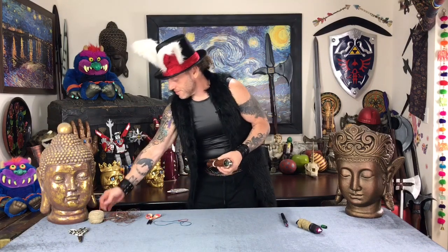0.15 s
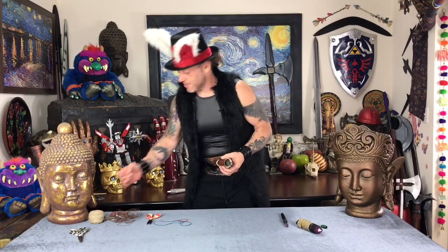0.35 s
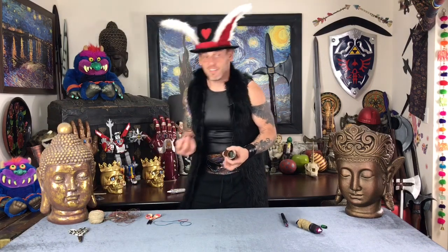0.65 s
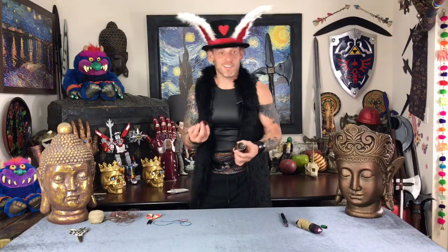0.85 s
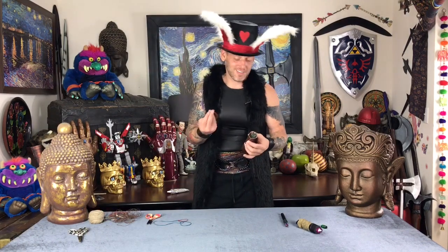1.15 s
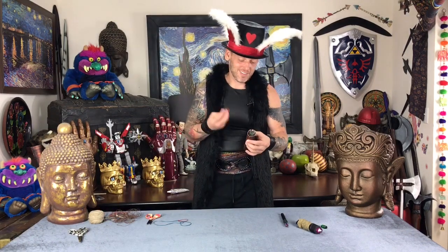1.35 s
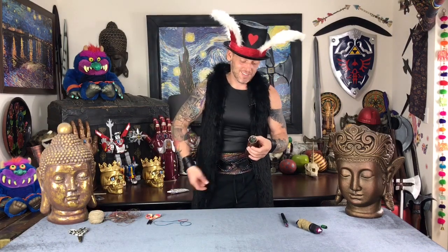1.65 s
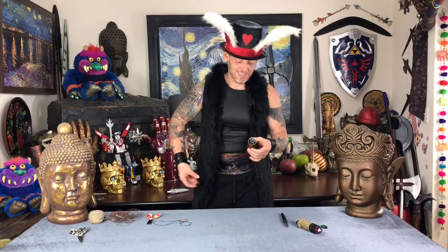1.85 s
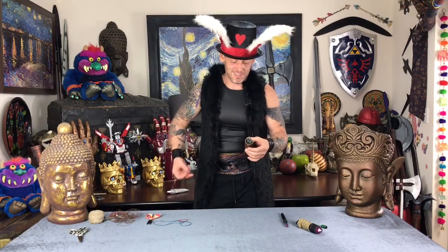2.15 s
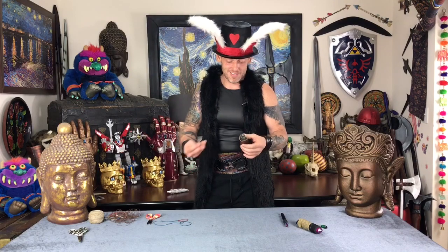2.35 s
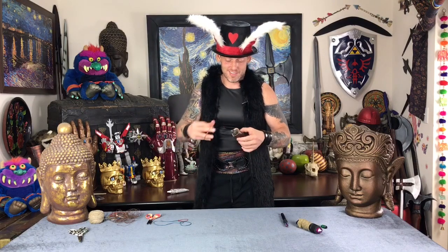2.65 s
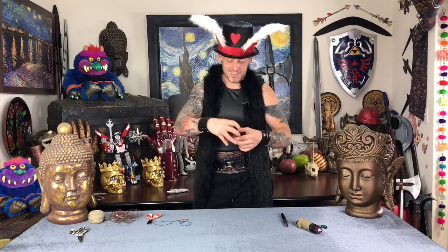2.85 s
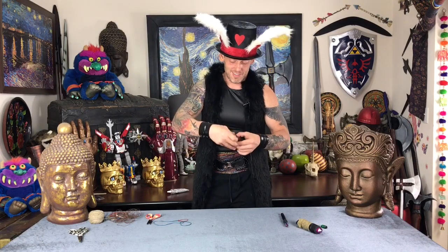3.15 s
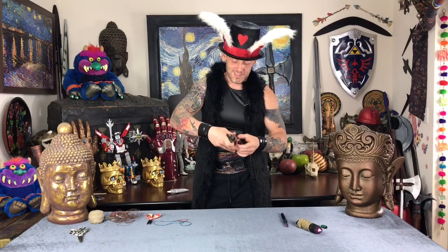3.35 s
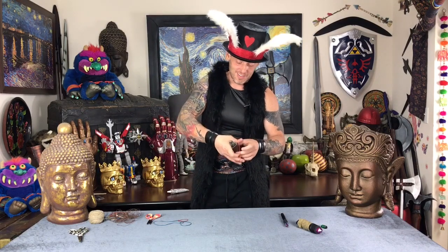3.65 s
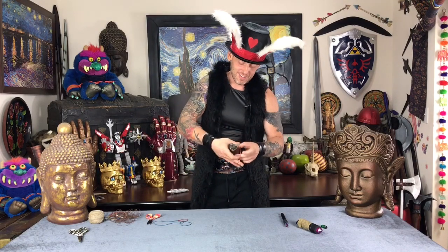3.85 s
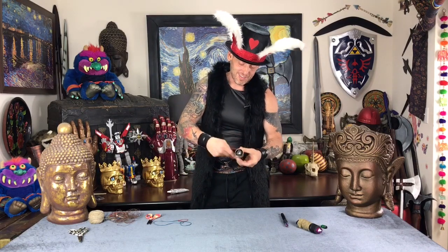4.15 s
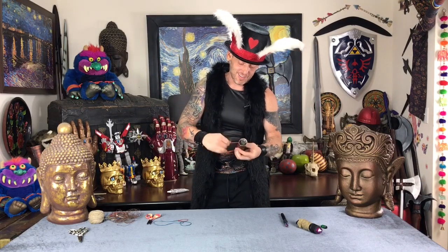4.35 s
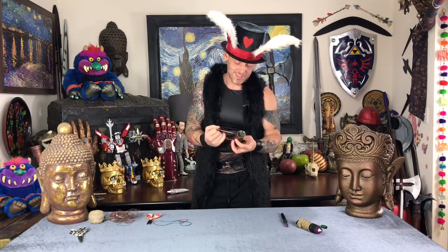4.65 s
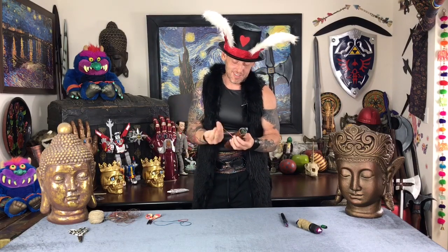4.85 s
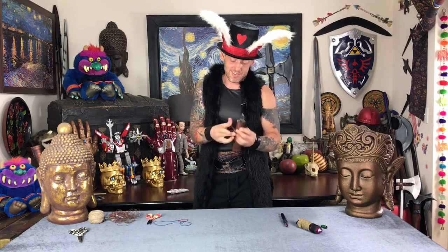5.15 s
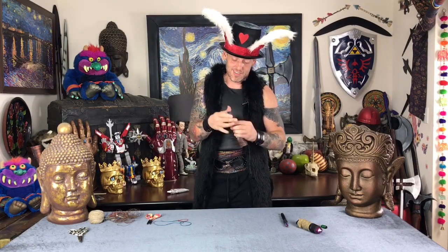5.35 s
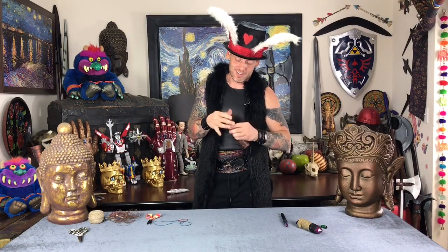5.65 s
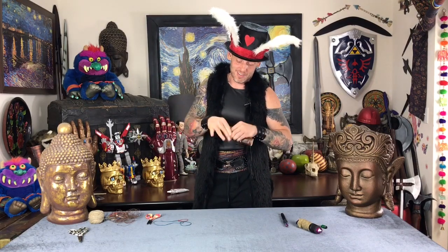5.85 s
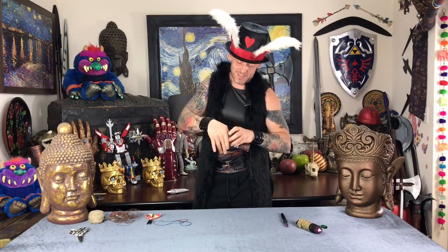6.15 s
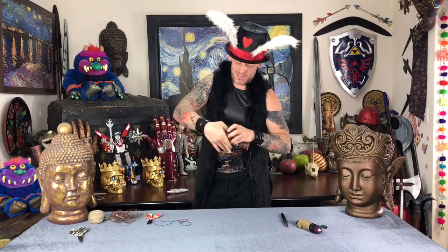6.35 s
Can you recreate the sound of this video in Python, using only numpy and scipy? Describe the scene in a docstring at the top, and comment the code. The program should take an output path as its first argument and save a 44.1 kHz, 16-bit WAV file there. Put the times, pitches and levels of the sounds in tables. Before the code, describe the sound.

In a small cluttered room, faint cloth rustles and sparse rubber snaps lead past one low thump to crowding snaps and a loudest final crack.

```python
"""Rubber bands are stretched and snapped round a roll of fabric on a flashlight in a small, crowded room.
Mains hum, room air and rumble run underneath; first come a few faint snaps and one low thump.
Then the snaps crowd together, up to the loudest at the end: each is a short slip that rings the bundle and room.
The tauter the band, the brighter the snap, and two snaps leave a band twanging.
All along, shaped noise makes the cloth rustle, as each band is pulled and as fingers stroke it."""
import sys
import numpy as np
from scipy import signal
from scipy.fft import rfft, irfft
from scipy.io import wavfile

SR = 44100
rng = np.random.default_rng(int(sys.argv[2]) if len(sys.argv) > 2 else 0)


def unload_wav(signal):
    """Save mono or channel-first audio to the path in sys.argv[1] as 16-bit WAV at rate SR, clipped to [-1, 1]."""
    wavfile.write(
        sys.argv[1],
        SR,
        np.round(np.clip(np.atleast_2d(signal).T, -1, 1) * 32767).astype(np.int16),
    )


N = 286650
TIME = np.arange(N) / SR  # seconds

# Still air in the room. Each row: frequency in Hz, relative level in dB.
AIR_COLOUR = [(5, 47), (20, 25), (45, 9.5), (100, 2), (330, -1.5), (700, -9), (1000, -14.5), (1250, -12.5),
              (1700, -21.5), (3000, -27), (7000, -30.5), (15000, -33.5)]
# Mains hum and the faint tones of some appliance. Each row: frequency in Hz, level in dB.
HUM_TONES = [(59, -62.5), (119.8, -59), (240, -74), (338, -68), (398, -74), (522, -76), (700, -76.5)]
# Low rumbles. Each row: middle in seconds, length to either side in seconds, level in dB.
RUMBLE_SWELLS = [(0.134, 0.14, -32.5), (1.545, 0.06, -35.5)]

THUMP_S = 1.3035

# Resonances that colour the rubbing. Each row: frequency in Hz, gain in dB.
CLOTH_COLOUR = [(1400, 5), (1800, 6), (2300, 4.5), (2800, 2), (3500, 3.5), (4500, -3), (5500, -1),
                (7500, -0.5), (9500, -0.5), (12500, 4), (15500, -3.5)]
# Ranges of the rub, the scrape and the hiss. Each row: lowest Hz, highest Hz.
RUB_RANGES = [(1400, 4500), (4500, 9000), (9000, 16500)]
# Strokes of the fingers on the cloth. Each row: start in seconds, length in seconds,
# level in dB before the overall cloth level, brightness in dB of hiss over rub.
FINGER_STROKES = [(0.393, 0.19, -74, -4), (1.375, .36, -76.5, -12), (2.447, .13, -71, 12.5),
                  (2.599, .11, -77, 16), (2.917, .095, -68, 0), (3.018, 0.16, -68.5, 3),
                  (3.19, .16, -69.5, -5), (3.676, 0.11, -63.5, -7), (3.782, 0.12, -63, -3.5),
                  (3.867, .17, -71.5, 4), (4.137, 0.16, -71.5, 3), (4.312, 0.13, -68, 6),
                  (4.691, .15, -65, 6), (4.98, 0.066, -61, 3), (5.098, 0.21, -65.5, -10),
                  (5.328, 0.095, -52.5, -9.5), (5.867, 0.19, -66.5, -4), (6.024, 0.25, -62, -10)]
SCRAPE_DB = -2  # the scrape between rub and hiss, against the level of a stroke or pull

# Rubber drags over the cloth round every snap.
PULL_DB, PULL_SHARE = -58, 0.35  # level round a 0 dB snap before the cloth level; dB per dB of the snap
PULL_RISE_S, PULL_FALL_S = 0.11, 0.098  # time constants of build-up and fade
PULL_BRIGHT_DB = -4.5  # hiss over rub

# Snaps and ticks of the bands. Each row: start in seconds, level in dB, ring in Hz,
# slip in milliseconds, fizz in dB over the level.
BAND_SNAPS = [(0.5922, -45, 1280, 3, -7), (0.9963, -54, 1230, 1.7, 0.5), (1.4234, -63, 1730, 1.3, 5.5),
              (2.404, -67, 4220, 12, 14.5), (3.157, -54.5, 1930, 4.1, -21), (3.2676, -50.5, 1400, 3.4, -12),
              (3.4503, -40, 1600, 1.86, -5.5), (3.613, -41, 2500, 1.4, -16), (4.092, -57, 3070, 1.3, 2),
              (4.3205, -37, 1090, 2.14, -3), (4.4367, -41.5, 1500, 2.3, -12),
              (4.4918, -45.5, 1460, 3.9, -0.5), (4.532, -39.5, 1600, 1.9, -13),
              (4.6269, -54, 1670, 1.5, -34), (4.6843, -50.5, 2420, 6.3, -2), (4.72, -45.5, 1950, 2.4, -7),
              (4.7553, -50, 2280, 2, 4.5), (5.1559, -35.5, 1770, 3.4, -5), (5.1745, -30.5, 2670, 8.3, -6.5),
              (5.3664, -27.5, 2380, 3.1, -0.5), (5.3997, -41, 1950, 2.8, -9), (5.615, -58, 1380, .9, -9),
              (5.653, -62, 1480, 3.9, -8), (5.8478, -60, 1930, 2.3, -11), (6.0414, -55, 3520, 0.82, -3),
              (6.0887, -39.5, 3250, 1.6, 1), (6.159, -44, 2420, 4.4, -1.5), (6.179, -57.5, 6000, 0.77, 24),
              (6.1853, -41, 910, 1.3, -12), (6.2043, -34, 1360, 2.3, 1), (6.3383, -34, 1680, 1.53, -9),
              (6.4144, -14, 1680, 1.07, -3)]
# Ranges of a snap's body, knock, crack and fizz. Each row: lowest Hz, highest Hz.
SNAP_RANGES = [(300, 900), (900, 2200), (2200, 5000), (5000, 16000)]
# A middling snap, which the others are compared with.
USUAL_RING_HZ, USUAL_SLIP_MS = 1700, 2
# Its make-up: body, knock and crack, each in dB over its level.
USUAL_MIX_DB = [-5.5, 1.4, 0.5]
# A tauter band rings higher: change of body, knock and crack, each in dB per octave of ring.
TAUT_CHANGE_DB = [-10.5, -8.5, 5]
# A longer slip pushes the roll harder: change of body in dB per doubling of the slip.
PUSH_DB_PER_DOUBLING = 5
# Colour that the wrapped flashlight gives every snap. Each row: frequency in Hz, gain in dB.
BUNDLE_COLOUR = [(330, -4.5), (500, -1), (800, 0.5), (1200, 2.5), (1700, 3.5), (2200, 1), (2700, -1.5),
                 (3200, 0.5), (3900, -1.5), (4500, -5), (5100, -1), (8000, 4.5), (10500, 4.5), (12500, 5.5),
                 (15000, 2)]
# Bands left vibrating. Each row: start in seconds, settled pitch in Hz, level in dB,
# ring time in seconds, buzz from 0 to 1.
BAND_TWANGS = [(4.436, 503, -41.5, 0.015, 0.2), (5.186, 153.3, -37.5, 0.04, 0.71)]
# How the bundle gives off a band's harmonics. Each row: frequency in Hz, gain in dB.
TWANG_RADIATION = [(150, -9.5), (310, -9), (470, 3), (620, 6), (900, 2), (1280, 6.5), (1600, -10.5),
                   (3000, 3), (6000, -22)]

# Colour of the reflections. Each row: frequency in Hz, relative level in dB.
WALL_COLOUR = [(200, 11), (600, 3.5), (1000, 4.5), (1550, 0.5), (2400, 2.5), (3800, -4), (6000, -1),
               (10000, -5), (15000, 2.5)]
TOP_HZ = 16000  # the recorder passes nothing much above this


def undb(db):
    """Turn decibels into a gain."""
    return 10 ** (np.asarray(db) / 20)


def unit(x):
    """Scale to an average strength (rms) of 1."""
    return x / np.sqrt(np.mean(x ** 2))


def band(x, lo_hz, hi_hz, order=2):
    """Keep only the sound between two frequencies."""
    edges = [lo_hz, min(hi_hz, SR / 2 - 100)]
    return signal.sosfilt(signal.butter(order, edges, "band", fs=SR, output="sos"), x)


def gain_at(hz, points):
    """Read gains off a table of (Hz, dB), joining its points along a log frequency scale."""
    f, db = np.transpose(points)
    return undb(np.interp(np.log(np.maximum(hz, 1)), np.log(f), db))


def colour(x, points):
    """Shape a sound's spectrum by a table of (Hz, dB)."""
    gain = gain_at(np.fft.rfftfreq(len(x), 1 / SR), points)
    return irfft(rfft(x) * gain, len(x))


def causal(gain):
    """Find the sharpest response that has these gains and never starts early."""
    cepstrum = irfft(np.log(gain))
    half = len(cepstrum) // 2
    # fold the part before time zero onto the part after it
    cepstrum[1:half] *= 2
    cepstrum[half + 1:] = 0
    return np.exp(rfft(cepstrum))


def add(out, s, x):
    """Mix x into out from time s."""
    i = int(s * SR)
    out[i:i + len(x)] += x[:N - i]


def background(air_db=-41, rumble_top_hz=48):
    """Steady room air is shaped noise, hum is a set of sines, and low noise swells twice as rumble."""
    air = undb(air_db) * colour(rng.standard_normal(N), AIR_COLOUR)
    hum = np.zeros(N)
    for hz, db in HUM_TONES:
        hum += undb(db) * np.sqrt(2) * np.sin(2 * np.pi * (hz * TIME + rng.random()))
    swell = np.zeros(N)
    for middle, length, db in RUMBLE_SWELLS:
        swell += undb(db) * np.exp(-((TIME - middle) / length) ** 2)
    rumble = swell * unit(band(rng.standard_normal(N), 12.3, rumble_top_hz, order=3))
    return air + hum + rumble


def thump(rise_s=0.02, ring_hz=48, ring_s=0.012, level_db=-7, hold_s=0.0082, land_s=0.00091,
          release_s=0.0015, push_db=-8, bump_db=-18, tick_db=-49):
    """A low thump: pressure swells, a brief blunt push tops it, and it swings back once or twice."""
    t = TIME - THUMP_S
    crest = t - hold_s / 2  # time from the top of the swell
    rise = np.exp(-abs(crest) / rise_s)
    swing = np.exp(-abs(crest) / ring_s) * np.cos(2 * np.pi * ring_hz * crest)
    swell = np.where(crest < 0, rise, swing)
    swell = signal.sosfiltfilt(signal.butter(2, 120, fs=SR, output="sos"), swell)
    push = (np.tanh(t / land_s) - np.tanh((t - hold_s) / release_s)) / 2
    contact = np.exp(-((t - land_s) / (2 * land_s)) ** 2)  # the push is hardest as it lands
    tick_colour = [(500, -20), (3000, -13), (6000, -12), (15000, -27)]  # (Hz, dB)
    tick = contact * unit(colour(rng.standard_normal(N), tick_colour))
    return undb(level_db) * swell + undb(push_db) * push + undb(bump_db) * contact + undb(tick_db) * tick


def touch(bright_db):
    """Give the gains of rub, scrape and hiss: a light touch hisses, a firm one rubs."""
    return undb([-bright_db / 2, SCRAPE_DB, bright_db / 2])[:, None]


def strokes(arch=0.63):
    """Each stroke of the fingers presses in and eases off in one arch."""
    pressure = np.zeros((len(RUB_RANGES), N))
    for start, length, level_db, bright_db in FINGER_STROKES:
        progress = np.clip((TIME - start) / length, 0, 1)
        pressure += undb(level_db) * touch(bright_db) * abs(np.sin(np.pi * progress)) ** arch
    return pressure


def pulls():
    """Pressure on the cloth builds as each band is pulled and fades once it has let go."""
    power = np.zeros(N)
    for s, level_db, *_ in BAND_SNAPS:
        # time from the snap, counted in build-ups before it and fades after it
        away = np.maximum((s - TIME) / PULL_RISE_S, (TIME - s) / PULL_FALL_S)
        pressure = undb(PULL_DB + PULL_SHARE * level_db) * np.exp(-np.minimum(away, 20))
        power += pressure ** 2
    return np.sqrt(power) * touch(PULL_BRIGHT_DB)


def cloth(grain_db=2, drag_db=1.9, wander_db=0.73, level_db=-1):
    """In each stroke and pull the fingers drag unevenly, and fibres catch and slip in dense little grains."""
    # each grain holds its strength for 60 samples
    grains = grain_db * np.repeat(rng.standard_normal(N // 60 + 1), 60)[:N]
    drag = drag_db * unit(band(rng.standard_normal(N), 20, 69))
    friction = unit(undb(grains + drag))
    rustle = colour(friction * rng.standard_normal(N), CLOTH_COLOUR)
    # the colour wanders as the contact moves over the folds
    slow_noise = unit(band(rng.standard_normal((len(RUB_RANGES), N)), 7.5, 12))
    wander = undb(wander_db * slow_noise)
    textures = wander * [unit(band(rustle, lo, hi, order=4)) for lo, hi in RUB_RANGES]
    pressure = np.hypot(strokes(), pulls())
    return undb(level_db) * np.sum(pressure * textures, axis=0)


def fidgets(level_db=-66, spread_db=3, count=20):
    """Among the snaps the rubber creeps over itself in faint ticks, scattered at random."""
    out = np.zeros(N)
    for when, pitch, length, size in rng.random((count, 4)):
        s = 2.9 + 3.5 * when
        ring_hz, slip_ms = 1200 * 2 ** pitch, 1 + 2 * length
        tick_db = level_db + spread_db * (2 * size - 1)
        add(out, s, snap(ring_hz, slip_ms, balance(tick_db, ring_hz, slip_ms, fizz_db=-6.5)))
    return out


def twangs(tension=0.029, settle_s=.011, damping_hz=2200):
    """A freed band swings and slaps the roll once a cycle; its pitch sags and its treble dies first."""
    out, t = np.zeros(N), TIME[:SR // 4]
    for s, hz, db, ring_s, buzz in BAND_TWANGS:
        k = np.arange(1, int(6000 / hz))[:, None]  # harmonic numbers
        pitch_hz = hz * (1 + tension * np.exp(-t / settle_s))
        phase = 2 * np.pi * np.cumsum(pitch_hz) / SR
        # friction on the cloth stops the swing faster and faster
        damping = 1 + (k * hz / damping_hz) ** 4
        fade = np.exp(-(t / ring_s * damping) ** 2)
        size = gain_at(k * hz, TWANG_RADIATION) * k ** (2 * (buzz - 1.))
        scatter = .8 * rng.standard_normal(k.shape)  # radians
        x = np.sum(size * fade * np.cos(k * phase + scatter), axis=0)
        add(out, s, x * undb(db) / np.sqrt(np.sum(size ** 2) / 2))
    return out


def balance(level_db, ring_hz, slip_ms, fizz_db):
    """Body, knock, crack and fizz of a snap in dB: taut bands crack, slack ones knock, long slips add body."""
    octaves = np.log2(ring_hz / USUAL_RING_HZ)
    db = level_db + np.array(USUAL_MIX_DB) + np.array(TAUT_CHANGE_DB) * octaves
    db[0] += PUSH_DB_PER_DOUBLING * np.log2(slip_ms / USUAL_SLIP_MS)
    return np.append(db, level_db + fizz_db)


def snap(ring_hz, slip_ms, levels_db, scrape=0.38, ring=0.099, cycles=1.45, low_hz=300):
    """Rubber lets go: a sharp contact, a dying scrape, and a few cycles of the damped bundle."""
    t = TIME[:2048]
    hz = np.maximum(np.fft.rfftfreq(len(t), 1 / SR), 1)
    force = scrape * rng.standard_normal(len(t)) * np.exp(-1000 * t / slip_ms)  # 1000 turns s into ms
    force[0] += 1  # the sharp contact
    body = np.exp(-t * ring_hz / cycles) * np.cos(2 * np.pi * ring_hz * t)
    # a small thing gives off little bass
    radiation = gain_at(hz, BUNDLE_COLOUR) / np.sqrt(1 + (low_hz / hz) ** 6)
    ringing = 1 + ring * ring_hz / 2000 * rfft(body)
    spectrum = rfft(force) * ringing * causal(radiation + 0.0015)
    # each snap has its own balance of body, knock, crack and fizz, as rms over 5 ms
    centres = np.sqrt(np.prod(SNAP_RANGES, axis=1))
    for _ in range(2):  # the second pass comes closer
        power = []
        for lo, hi in SNAP_RANGES:
            inside = (hz > lo) & (hz < hi)
            power.append(2 * np.sum(abs(spectrum[inside]) ** 2) / (len(t) * .005 * SR))
        change_db = levels_db - 10 * np.log10(power)
        spectrum = spectrum * causal(gain_at(hz, np.c_[centres, change_db]))
    return irfft(spectrum)


def snaps():
    """Every listed slip of a band sounds at its moment, with its own mix of ranges."""
    out = np.zeros(N)
    for s, level_db, ring_hz, slip_ms, fizz_db in BAND_SNAPS:
        add(out, s, snap(ring_hz, slip_ms, balance(level_db, ring_hz, slip_ms, fizz_db)))
    return out


def room(sides, t60_s=0.19, wet_db=-15, early_s=0.0075, early_db=-18, gap_s=0.0044):
    """Table and clutter scatter the sound at once and a short tail follows; each side takes its own paths."""
    t, out = TIME[:SR // 3], np.zeros(N)
    for x in sides:
        early = colour(rng.standard_normal(len(t)), WALL_COLOUR) * np.exp(-t / early_s)
        # the tail falls by 60 dB in t60_s
        late = colour(rng.standard_normal(len(t)), WALL_COLOUR) * np.exp(-np.log(1000) * t / t60_s)
        response = undb(early_db) * unit(early) + undb(wet_db) * unit(late)
        response = response / np.sqrt(len(t) * len(sides))
        add(out, gap_s, signal.oaconvolve(x, response)[:N])
    return out


def scene():
    """Hands at work in the room, with the thump and the background."""
    handling = twangs() + cloth() + fidgets()
    # a snap radiates differently in each direction, so the walls hear other sides of it
    sides = [snaps() + handling for _ in range(2)]
    mix = snaps() + handling + room(sides) + thump() + background()
    return mix[None]


def record(dry):
    """The recorder blocks steady pressure, rounds peaks near full scale and cuts the top."""
    x = signal.sosfilt(signal.butter(1, 2.5, "high", fs=SR, output="sos"), dry)
    x = x / (1 + (x / .83) ** 8) ** (1 / 8)  # peaks stay below 0.83
    return signal.sosfilt(signal.ellip(8, .2, 70, TOP_HZ, fs=SR, output="sos"), x)


dry = scene()
out = record(dry)
unload_wav(out)
```